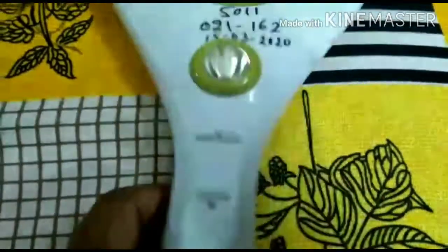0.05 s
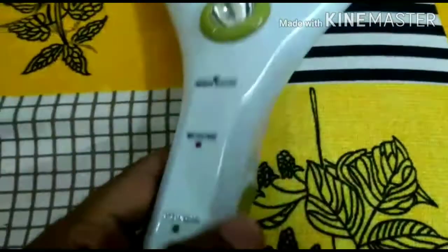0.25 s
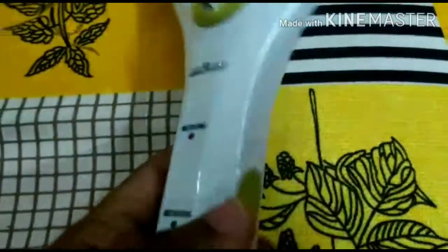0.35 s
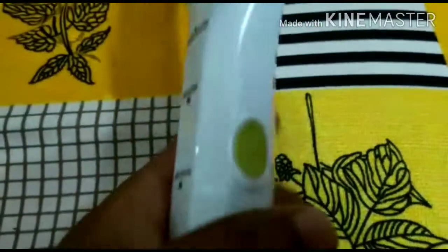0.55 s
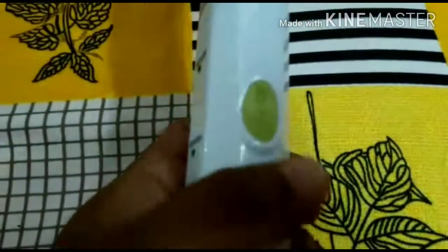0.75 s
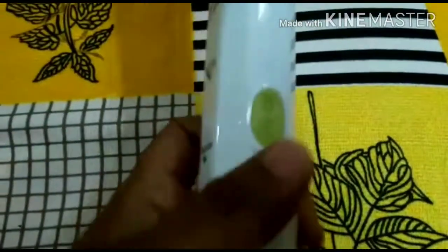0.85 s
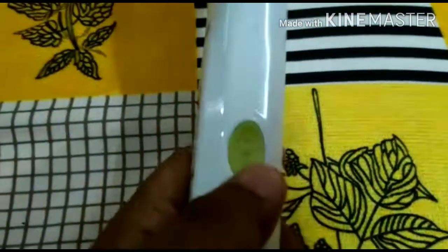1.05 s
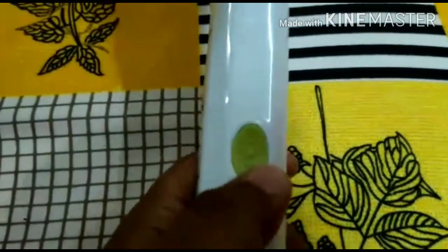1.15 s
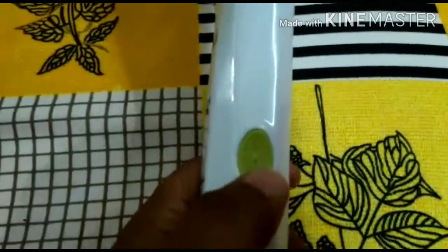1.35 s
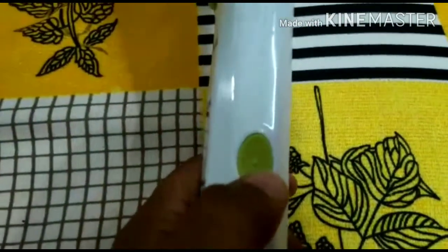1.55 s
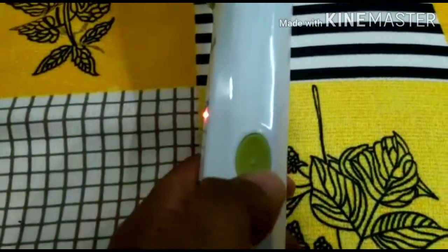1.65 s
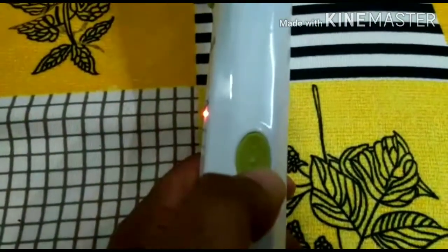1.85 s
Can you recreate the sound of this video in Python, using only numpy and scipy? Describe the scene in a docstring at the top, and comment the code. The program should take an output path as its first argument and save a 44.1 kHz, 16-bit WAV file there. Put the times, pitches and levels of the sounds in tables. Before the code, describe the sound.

An electric mosquito racket cracks once, very loudly, at about 0.23 s, after faint hand rubbing and a tiny tick. The clipped bang roars briefly, and a bright, hissing small-room echo fades by about 0.8 s. Hollow knocks and a faint squeak come at 0.57-0.7 s, scattered plastic clicks and rubbing from 0.8 s, a firm button click at 1.64 s, and dull thumps near 1.83 s, over faint hiss.

```python
"""An electric mosquito racket discharges once in a small room: shock fronts and noise bursts form a sharp
crack that overloads two microphones, followed by wall echoes and a bright, hissing reverberation.
A hand slides down the plastic handle: shaped noise rubs and rumbles, damped modes tick, knock and thump,
a rough tone squeaks, and the thumb clicks the button. A steady filtered hiss lies underneath."""
import sys
import numpy as np
from scipy import signal
from scipy.fft import rfft, irfft, next_fast_len
from scipy.io import wavfile
from scipy.ndimage import map_coordinates

SR = 44100
rng = np.random.default_rng(int(sys.argv[2]) if len(sys.argv) > 2 else 0)


def wrap_up_sound(samples):
    """Save the sound to the file named by the first command line argument, as 16-bit audio."""
    columns = np.atleast_2d(samples).T
    # keep every value between -1 and 1, then stretch to whole-number steps
    tamed = np.clip(columns, -1, 1)
    steps = np.round(tamed * 32767).astype(np.int16)
    wavfile.write(sys.argv[1], SR, steps)


N = 83790  # samples


def amp(db):
    """Level law: decibels to amplitude gain."""
    return 10 ** (np.asarray(db) / 20)


def unit(x):
    """Normalisation: scale to rms 1."""
    return x / np.sqrt(np.mean(x ** 2) + 1e-20)


def along(points, hz):
    """Interpolation of (Hz, value) points on a logarithmic frequency axis."""
    f, v = np.transpose(points)
    return np.interp(np.log(hz + 1), np.log(f + 1), v)


def since(s):
    """Time origin: seconds after s, per sample, with one row per time given."""
    return np.arange(N) / SR - np.asarray(s)[..., None]


def curves(rows):
    """Linear interpolation in time of each column after the first."""
    s, *cols = np.transpose(rows)
    return [np.interp(since(0), s, c) for c in cols]


def fade(t, t60):
    """Exponential decay by 60 dB in t60 seconds, silent before t = 0."""
    return (t >= 0) * amp(-60 * np.maximum(t, 0) / t60)


def filtered(x, response):
    """Linear filtering: the spectrum of x times a response of frequency."""
    m = next_fast_len(N + SR // 4)
    return irfft(rfft(x, m) * response(np.fft.rfftfreq(m, 1 / SR)), m)[..., :N]


def noise(tone, lean=((1000, 0),), shared=0):
    """Spectral shaping of stereo noise to rms 1; lean is left minus right dB, shared the common power."""
    left_right, common = rng.standard_normal((2, N)), rng.standard_normal(N)

    def response(hz):
        sides = amp(along(lean, hz) * np.array([[.5], [-.5]]))
        return amp(along(tone, hz)) * sides / np.linalg.norm(sides, axis=0)

    return unit(filtered(np.sqrt(1 - shared) * left_right + np.sqrt(shared) * common, response))


def ring(modes, t, attack, spread):
    """Modal synthesis: damped sines whose level (1 dB rms) and pitch (spread) vary at each blow."""
    t = np.maximum(t, 0)
    total = 0
    for hz, db, t60 in modes:
        level = amp(db + rng.normal(0, 1))
        pitch = hz * (1 + spread * rng.normal())
        total = total + level * fade(t, t60) * np.sin(2 * np.pi * pitch * t)
    return (1 - np.exp(-t / attack)) * total


def flutter(width_hz):
    """Narrow-band modulation: a complex random envelope of rms 1 for each microphone."""
    a, b = filtered(rng.standard_normal((2, 2, N)), lambda hz: 1 / (1 + (hz / width_hz) ** 4))
    return (unit(a) + 1j * unit(b)) / np.sqrt(2)


def grain(length_s):
    """Low-pass randomness: a curve of rms 1 whose lumps last about length_s."""
    return unit(filtered(rng.standard_normal(N), lambda hz: 1 / (1 + (2 * hz * length_s) ** 4)))


# Spectrum of the steady background. Each row: frequency in Hz, relative level in dB.
HISS_SPECTRUM = [(350, -48.5), (600, -29.5), (1100, -29.5), (1330, -26), (1530, -12), (2040, -1),
                 (2680, -2), (3240, -30.5), (4090, -33), (5660, -34.5), (6310, -9.5), (10400, -37),
                 (15500, -34.5)]
HISS_DB = -54


def background_hiss():
    """Stationary noise: a constant level with a fixed spectrum."""
    lean = [(600, -4), (1200, -7.0), (2400, -36.5), (4000, -14.0), (7000, -28.5), (10000, -13.5),
            (15000, -12.5)]
    return amp(HISS_DB) * noise(HISS_SPECTRUM, lean)


# Course of the handling rumble. Each row: time in seconds, level in dB.
RUMBLE_LEVEL = [(0, -71), (.15, -74), (.33, -54.5), (.48, -57.5), (.56, -75), (.8, -75.5), (.86, -71),
                (.92, -74), (1.2, -76), (1.65, -73.5), (1.7, -59), (1.77, -75), (1.815, -58.5), (1.9, -58)]
# Spectrum of the rumble. Each row: frequency in Hz, relative level in dB.
RUMBLE_SPECTRUM = [(25, -16), (60, -2), (100, 1), (170, -6), (300, -9.5), (600, -15), (1500, -35),
                   (4000, -58)]


def rumble():
    """Low-frequency noise under amplitude modulation: the handling rumble rises and falls."""
    level_db, = curves(RUMBLE_LEVEL)
    return amp(level_db) * noise(RUMBLE_SPECTRUM, [(100, -5)], shared=0.41)


# Course of the sliding hand. Each row: time in seconds, level in dB before the gain and grain below.
RUB_LEVEL = [(0, -41.5), (.06, -46), (.11, -47.5), (.2, -46), (.5, -56.5), (.62, -52), (.72, -53),
             (.765, -48.5), (.8, -61), (.835, -53), (.857, -42), (.88, -47.5), (.95, -46), (1.0, -57.5),
             (1.085, -49), (1.14, -59), (1.3, -62), (1.345, -56), (1.38, -74.5), (1.7, -57), (1.83, -51.5),
             (1.9, -60.5)]
# Spectrum of the rub. Each row: frequency in Hz, relative level in dB.
RUB_SPECTRUM = [(180, -57.5), (300, -24.5), (500, -29), (769, -40.5), (937, -23.5), (1300, -40),
                (1480, -17), (1700, -15), (2560, 0), (3810, -18.5), (4210, -13), (5850, -14.5),
                (7370, -3.5), (8700, -15), (15500, -26)]
# Balance of the rub. Each row: frequency in Hz, left minus right in dB.
RUB_BALANCE = [(300, -13.5), (1200, -14), (2400, -37), (4000, -7), (7000, -26.5), (10000, -4.5),
               (15000, -6)]
# Valley between the case's resonances. Each row: frequency in Hz, gain in dB.
CASE_VALLEY = [(2950, -0.5), (3450, -5.5), (4100, 0.5)]
RUB_GAIN_DB, RUB_GRAIN_DB, RUB_GRAIN_S = 2.0, 0.89, 0.003


def rub():
    """Friction noise: skin slides on the handle with a grainy hiss, filtered by the case."""
    level_db, = curves(RUB_LEVEL)
    level_db = level_db + RUB_GRAIN_DB * grain(RUB_GRAIN_S) + RUB_GAIN_DB
    friction = amp(level_db) * noise(RUB_SPECTRUM, RUB_BALANCE)
    return filtered(friction, lambda hz: amp(along(CASE_VALLEY, hz)))


# Bumps of the grip. Each row: start in seconds, level in dB, centre in Hz, half-width in Hz,
# rise time constant in seconds, t60 in seconds.
GRIP_BUMPS = [(.79, -53.5, 484, 34.8, .015, 0.21), (0.813, -50, 1224, 330, 0.0011, 0.13),
              (1.208, -64, 526, 45.1, 0.0043, .31), (1.298, -60, 349, 45, 0.0071, 0.37),
              (1.347, -58, 520, 54.7, 0.0053, 0.42), (1.599, -50, 535, 110, 0.0023, 0.075),
              (1.687, -50, 485, 120, 0.0016, 0.17), (1.822, -43, 469, 101, .001, 0.081),
              (1.872, -53.5, 398, 90, 0.0033, 0.14)]


def grip_bumps():
    """Damped narrow-band resonance: each bump of the grip is a dull, unsteady note."""
    out = np.zeros((2, N))
    for s, db, hz, half_width, rise, t60 in GRIP_BUMPS:
        t = np.maximum(since(s), 0)
        envelope = amp(db) * (1 - np.exp(-t / rise)) * fade(t, t60)
        out += envelope * np.real(flutter(half_width) * np.exp(2j * np.pi * hz * t))
    return out


# The handle settles in the palm. Each row: start in seconds, level in dB, frequency in Hz.
PALM_THUMPS = [(1.436, -60.5, 159), (1.822, -44.5, 194), (1.832, -41, 144), (1.863, -43.5, 164)]
THUMP_T60, THUMP_RISE_S = 0.034, 0.0014  # s; the rise is a time constant


def palm_thumps():
    """Heavily damped low modes: the handle thumps against the palm."""
    return sum(ring([(hz, db, THUMP_T60)], since(s), THUMP_RISE_S, spread=0.012)
               for s, db, hz in PALM_THUMPS)


# Finger on plastic. Each row: time in seconds, frequency in Hz, level in dB.
FINGER_SQUEAK = [(.595, 367, -64), (.612, 327, -59.5), (.625, 242, -57.5), (.66, 225, -61), (.7, 245, -69)]
SQUEAK_ROUGH, SQUEAK_ROUGH_HZ = 2.5, 61  # modulation depth, bandwidth


def squeak():
    """Frictional tone: a gliding pitch roughened by random modulation."""
    hz, db = curves(FINGER_SQUEAK)
    carrier = np.exp(2j * np.pi * np.cumsum(hz) / SR)
    slip = unit(np.real((1 + SQUEAK_ROUGH * flutter(SQUEAK_ROUGH_HZ)) * carrier))
    sounding = (since(FINGER_SQUEAK[0][0]) > 0) * (since(FINGER_SQUEAK[-1][0]) < 0)
    return amp(db) * slip * sounding


GRIP_LEAN_DB = -13  # left minus right


def grip():
    """Level difference: bumps and thumps lean to the right microphone, the squeak to neither."""
    sides = amp(GRIP_LEAN_DB * np.array([[.5], [-.5]]))
    return sides * (grip_bumps() + palm_thumps()) + squeak()


RING_SPREAD = .008  # relative pitch spread of the plastic's modes from blow to blow

# Hollow knocks of the handle. Each row: start in seconds, level in dB.
HANDLE_KNOCKS = [(.5688, -42.5), (.6440, -37.5), (.6872, -42)]
# Modes of the hollow handle. Each row: frequency in Hz, relative level in dB, t60 in seconds.
HOLLOW_MODES = [(794, 5.5, 0.027), (750, -21, 0.021), (897, -1.5, 0.021)]
KNOCK_ROOM_DB, KNOCK_ROOM_T60 = -17, 0.29  # dB, s


def knocks():
    """Modal ringing and reverberation: the hollow handle knocks and its note hangs in the room."""
    direct = sum(amp(db) * ring(HOLLOW_MODES, since(s), attack=0.0025, spread=RING_SPREAD)
                 for s, db in HANDLE_KNOCKS)
    echo = sum(amp(db + KNOCK_ROOM_DB) * fade(since(s), KNOCK_ROOM_T60) for s, db in HANDLE_KNOCKS)
    note = np.exp(2j * np.pi * HOLLOW_MODES[0][0] * since(0))
    return direct + echo * np.real(flutter(width_hz=125) * note)


# Clicks of the handle and button. Each row: listed time in seconds (GIVE_S ahead of the snap), snap in dB
# (before SNAP_DB), low ring in dB, high ring in dB, left minus right in dB (before LEFT_SNAP_DB on the snap).
PLASTIC_CLICKS = [(0.0219, -31.5, -33, -58, -24), (0.5684, -19.5, -34.5, -47, -17),
                  (0.6436, -14, -32, -32, -22.5), (0.6867, -26.5, -43, -39.5, -33),
                  (0.815, -13, -27.5, -24.5, -24), (0.8243, -30, -35, -50, -25),
                  (0.8499, -28, -32, -40, -18), (0.865, -21.5, -21.5, -34, -21),
                  (1.0601, -22, -35, -35, -37), (1.1745, -25.5, -38.5, -37, -42),
                  (1.2106, -28.5, -24, -36, -27.5), (1.289, -42.5, -41, -54, -26),
                  (1.3121, -20.5, -26.5, -32.5, -29.5), (1.4361, -21, -24.5, -31.5, -20.5),
                  (1.517, -22.5, -49.5, -38, -37), (1.6002, -19.5, -37, -36, -29),
                  (1.6434, -4, -12, -17.5, -18), (1.6477, -24.5, -27, -52, -25),
                  (1.652, -19.5, -43, -39, -25), (1.6873, -29, -32, -46, -22),
                  (1.8269, -27, -37.5, -55.5, -36.5)]
# Low modes of the plastic. Each row: frequency in Hz, relative level in dB, t60 in seconds.
LOW_MODES = [(2584, 7.5, 0.01), (2382, 2.5, 0.015), (2664, -4.5, 0.0099)]
# High modes of the plastic. Each row: frequency in Hz, relative level in dB, t60 in seconds.
HIGH_MODES = [(7213, 16.5, 0.0048), (7280, -2.5, 0.0029), (6500, 5, 0.0028), (4100, -4, 0.015),
              (9520, -8.5, 0.0066)]
# Spectrum of the snap. Each row: frequency in Hz, relative level in dB.
SNAP_SPECTRUM = [(100, -18), (900, -23), (2000, 1.5), (3500, 0), (7000, 9), (10000, -4), (15000, -12.5)]
# The case radiates little bass. Each row: frequency in Hz, gain in dB.
CASE_RADIATION = [(300, -38.5), (900, -17.5), (1400, -6), (1950, 0), (2800, 1), (3500, -13), (4200, 0),
                  (5200, -7), (6500, 1), (15000, 0.5)]
GIVE_S, RING_ATTACK_S = .0007, 0.00042  # constant offset from listed time to snap; ring rise time constant
SNAP_DB, SNAP_T60, LEFT_SNAP_DB = -5.5, 0.01, 6.5
LEAD_S, LEAD_DB = 0.002, -15.5  # soft noise swelling into the snap: time constant, level re louder ring
CLICK_ROOM_DB, CLICK_ROOM_T60, CLICK_ROOM_DELAY_S = -14.5, 0.33, 0.0028


def clicks():
    """Impact excitation: plastic snaps and rings the case, and the room answers faintly."""
    out = np.zeros((2, N + SR))
    t = np.arange(-SR // 100, SR // 20) / SR  # around the moment of the snap
    snap_noise = noise(SNAP_SPECTRUM)
    for s, snap_db, low_db, high_db, lean_db in PLASTIC_CLICKS:
        first = round((s + GIVE_S + t[0]) * SR)
        span = slice(first, first + len(t))
        body = amp(low_db) * ring(LOW_MODES, t, RING_ATTACK_S, RING_SPREAD)
        body += amp(high_db) * ring(HIGH_MODES, t, RING_ATTACK_S, RING_SPREAD)
        lead_in = amp(max(low_db, high_db) + LEAD_DB) * (t < 0) * np.exp(-np.abs(t) / LEAD_S)
        snap = (lead_in + amp(snap_db + SNAP_DB) * fade(t, SNAP_T60)) * snap_noise[:, span]
        left = amp(lean_db) * (body + amp(LEFT_SNAP_DB) * snap[0])
        out[:, span] += [left, body + snap[1]]
    out = filtered(out[:, :N], lambda hz: amp(along(CASE_RADIATION, hz)))
    tail = rng.standard_normal((2, N)) * fade(since(CLICK_ROOM_DELAY_S), CLICK_ROOM_T60)
    answer = signal.fftconvolve(out, tail / np.linalg.norm(tail[0]), axes=1)[:, :N]
    return out + amp(CLICK_ROOM_DB) * answer


# The thumb pressing home. Each row: start in seconds, level in dB, t60 in seconds.
THUMB_THUDS = [(1.336, -55.5, 0.067), (1.5996, -51.5, 0.022), (1.643, -26, 0.014), (1.824, -45, 0.067)]
# Spectrum of the thuds. Each row: frequency in Hz, relative level in dB.
THUD_SPECTRUM = [(40, 2.5), (300, -9), (1400, -6), (3000, -7.5), (9000, -37.5)]
# Spectrum of the button's echoes. Each row: frequency in Hz, relative level in dB.
BUTTON_SPECTRUM = [(120, -47), (200, -12.5), (390, -13), (521, -10.5), (659, -11.5), (1200, -11),
                   (2290, -6), (3410, -5.5), (4550, 0.5), (5450, -6), (7420, -11), (13700, -16),
                   (15000, -21)]
BUTTON_S, BUTTON_ROOM_DB, BUTTON_T60 = 1.644, -33.5, 0.33  # the button bottoms out
CLUMP_DB, CLUMP_S = 2, 0.0025  # the echoes arrive in clumps: rms level change, length


def button():
    """Decaying noise: firm presses thud, and the loudest click reverberates in clumps of echoes."""
    thud = sum(amp(db) * fade(since(s), t60) for s, db, t60 in THUMB_THUDS)
    thud = thud * noise(THUD_SPECTRUM, [(100, -28), (700, -15)], shared=0.3)
    level = amp(BUTTON_ROOM_DB + CLUMP_DB * grain(CLUMP_S)) * fade(since(BUTTON_S), BUTTON_T60)
    lean = [(500, -6), (2400, -10), (4000, -7.5), (7000, -8), (11000, -0.5)]
    return thud + level * noise(BUTTON_SPECTRUM, lean)


# Spectrum of the reverberation. Each row: frequency in Hz, relative level in dB.
HALL_SPECTRUM = [(59, -52.5), (100, -28), (250, -33), (400, -29), (600, -32), (1020, -25), (1250, -28.5),
                 (2420, -6.5), (3050, -13), (3320, -10.5), (5630, -8.5), (7250, 0), (8580, -5.5),
                 (15500, -12.5)]
# Balance of the reverberation. Each row: frequency in Hz, left minus right in dB.
HALL_BALANCE = [(60, -5.5), (120, -10.5), (240, -12), (480, -6), (950, -3.5), (1890, -11.5), (3770, -4.5),
                (7520, -11.5), (15000, 5.5)]
# Decay of the room. Each row: frequency in Hz, t60 in seconds.
ROOM_DECAY = [(200, 0.55), (1500, .56), (3000, 0.48), (7000, 0.47), (14000, 0.34)]
HALL_DB, HALL_PEAK_S, HALL_RISE_DB_PER_S = -12, (0.27, 0.29), 329.5  # fullest at (left, right)
HALL_ROUND_S = 0.048  # rounds the start of the fall, so the reverberation lingers


def reverberation():
    """Frequency-dependent absorption: the room fills, lingers, then each band dies at its own speed."""
    hz, s, bands = signal.stft(noise(HALL_SPECTRUM, HALL_BALANCE), SR, nperseg=256)
    t = s - np.array(HALL_PEAK_S)[:, None, None]
    falling = np.hypot(np.maximum(t, 0), HALL_ROUND_S) - HALL_ROUND_S
    db = HALL_RISE_DB_PER_S * np.minimum(t, 0) - 60 * falling / along(ROOM_DECAY, hz)[:, None]
    tail = signal.istft(bands * amp(db), SR, nperseg=256)[1][:, :N]
    return amp(HALL_DB) * tail * (since(DISCHARGE[0][0]) > 0)


# Spectrum of the dense early echoes. Each row: frequency in Hz, relative level in dB.
ROAR_SPECTRUM = [(30, 2.5), (150, -2.5), (400, -2.5), (1200, -5), (2000, -1.5), (4000, -11), (15000, -26.5)]
ROAR_DB, ROAR_RISE_S, ROAR_END_S, ROAR_T60 = -15.5, 0.023, (0.25, 0.2835), 0.095  # ends (left, right)
SCATTER_PER_S, SCATTER_DB, SCATTER_S = 450, -10.5, .0003  # fronts thrown back by the furniture


def roar():
    """Dense early reflection: noise and random small fronts swell together, then decay."""
    arrivals = (rng.random((2, N)) < SCATTER_PER_S / SR) * rng.standard_normal((2, N))
    scatter = amp(SCATTER_DB) * signal.lfilter([1], [1, -np.exp(-1 / (SCATTER_S * SR))], arrivals)
    swell = np.clip(since(DISCHARGE[0][0]) / ROAR_RISE_S, 0, 1)
    swell = swell * fade(np.maximum(since(ROAR_END_S), 0), ROAR_T60)
    return swell * (scatter + amp(ROAR_DB) * noise(ROAR_SPECTRUM, shared=0.27))


# The discharge and its wall echoes. Each row: start in seconds, burst in dB, time from the start to
# the burst's decay in seconds, shock front in dB, low push in dB (before PUSH_LEFT_DB on the left).
DISCHARGE = [(0.2344, -2.5, 0.0012, 5, -5), (0.2397, -12.5, 0.0012, -6, -26),
             (0.2479, -14, .0034, -3.5, -15.5), (0.2498, -18, .001, -4, -11),
             (.2542, -22.5, 0.00062, -4, -18), (0.26, -19, 0.0031, -14.5, -15),
             (0.2669, -14, 0.0018, -5, -17.5)]
# Spectrum of the bursts. Each row: frequency in Hz, relative level in dB.
BURST_SPECTRUM = [(100, 4.5), (400, 7), (1000, 6), (2600, 1), (5000, -2), (7500, -0.5), (11000, -11),
                  (16000, -26)]
SHOCK_S, RIGHT_LAG_S = 0.00017, 0.00033  # front's time constant; later arrival at the right microphone
PUSH_S, PUSH_SPREAD, PUSH_LEFT_DB = 0.0017, 0.052, -2.5  # typical quarter period, its relative spread
FIZZ_S, FIZZ_DB = 0.229, -28  # sizzle from here until the spark jumps
BOOM_HZ, BOOM_DB, BOOM_RISE_S, BOOM_T60 = 57.6, -16, .012, .1  # a low boom under the crack


def crack():
    """Shock radiation: spark and echoes each give a steep front, a noise burst and a damped low swing."""
    spark_s = DISCHARGE[0][0]
    bursts, fronts, push = np.zeros(N), np.zeros((2, N)), np.zeros((2, N))
    for s, db, length, shock_db, push_db in DISCHARGE:
        t = since(s)
        bursts += amp(db) * (t >= SHOCK_S) * fade(np.maximum(t - length, 0), t60=0.006)
        t = since([s, s + RIGHT_LAG_S])
        fronts += amp(shock_db) * (t >= 0) * np.exp(-np.abs(t) / SHOCK_S)
        quarter_s = PUSH_S * np.exp(PUSH_SPREAD * rng.standard_normal((2, 1)))
        quarters = np.maximum(t / quarter_s, 0)
        push -= amp(push_db) * np.sin(quarters * np.pi / 2) * np.exp(-quarters * 0.39)
    fizz = amp(FIZZ_DB) * (since(FIZZ_S) > 0) * (since(spark_s) < 0)
    early_echoes = roar()
    boom = ring([(BOOM_HZ, BOOM_DB, BOOM_T60)], since(spark_s + PUSH_S), BOOM_RISE_S, spread=0.009)
    hissing = (bursts + fizz) * noise(BURST_SPECTRUM, [(200, 5.5), (3000, -2.5), (7000, -2)], shared=0.25)
    return hissing + fronts + push * amp([[PUSH_LEFT_DB], [0]]) + boom + early_echoes


RIPPLE_DB, RIPPLE_HZ = 2.5, 132.2  # full depth scale from 6 kHz up, spacing of the random knots


def ripple(hz):
    """Random colouration: fixed random gains over frequency make each microphone's treble uneven."""
    knots = rng.standard_normal((2, 1024))
    wiggle = np.array([map_coordinates(k, [hz / RIPPLE_HZ], mode="mirror") for k in knots])
    return amp(RIPPLE_DB * wiggle * np.clip(hz / 6000, 0, 1))


def scene():
    """Superposition: all sources add at the two microphones, some coloured by the ripple."""
    coloured = crack() + reverberation() + button() + rub() + background_hiss() + rumble()
    return filtered(coloured, ripple) + clicks() + knocks() + grip()


LOW_CUT_HZ, CLIP_TOP, TOP_HZ = 35, .88, 15800  # CLIP_TOP: amplitude approached in saturation


def record(dry):
    """Saturation: a gentle low cut, smooth limiting of loud peaks, then a sharp band limit."""
    x = filtered(dry, lambda hz: 1j * hz / (1j * hz + LOW_CUT_HZ))
    clipped = x / (1 + np.abs(x / CLIP_TOP) ** 6) ** (1 / 6)
    return filtered(clipped, lambda hz: hz < TOP_HZ)


dry = scene()
out = record(dry)
wrap_up_sound(out)
```